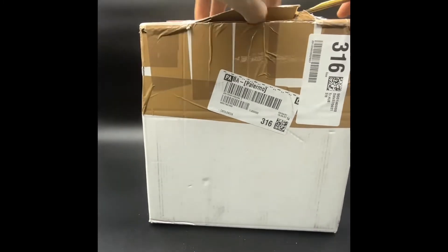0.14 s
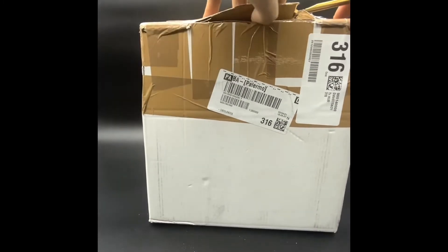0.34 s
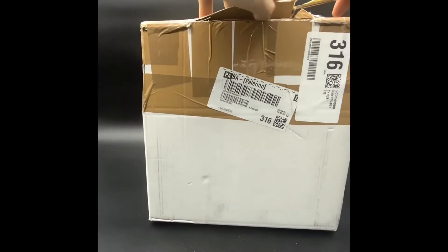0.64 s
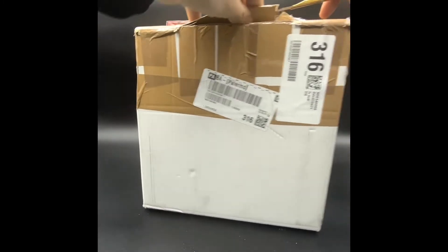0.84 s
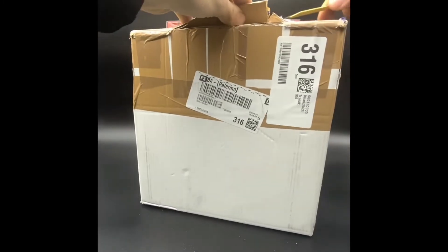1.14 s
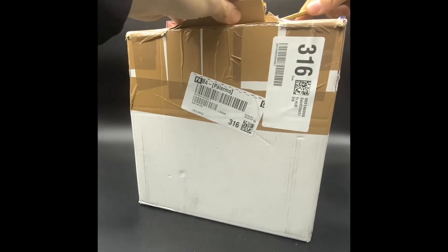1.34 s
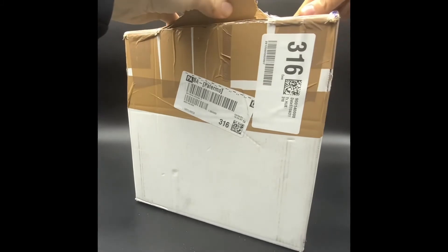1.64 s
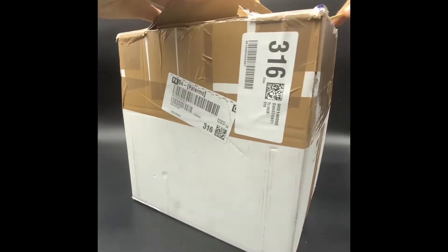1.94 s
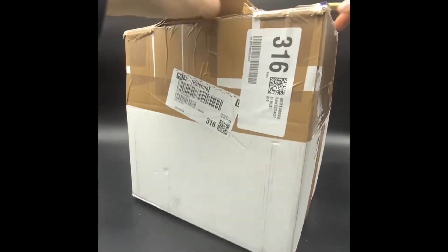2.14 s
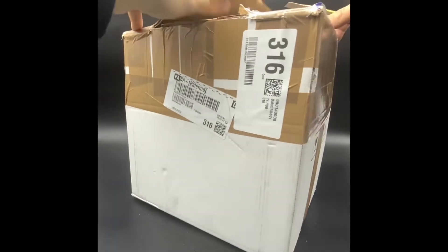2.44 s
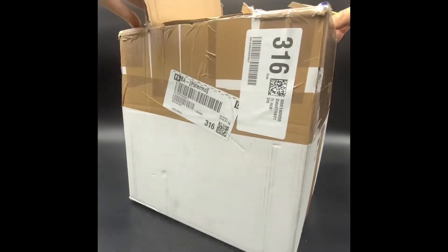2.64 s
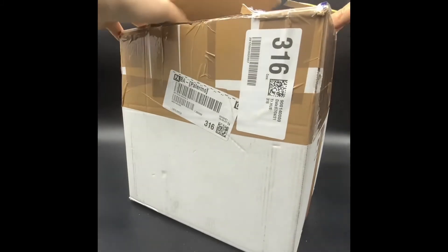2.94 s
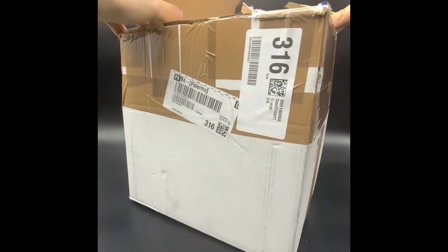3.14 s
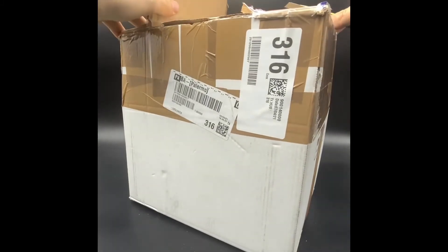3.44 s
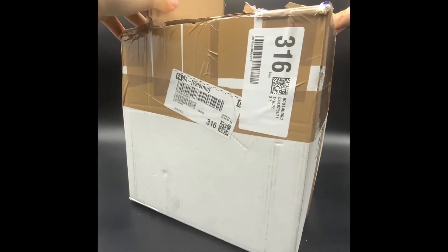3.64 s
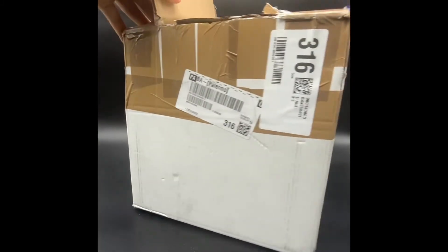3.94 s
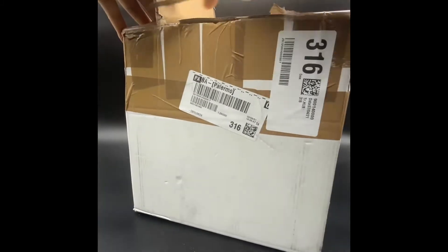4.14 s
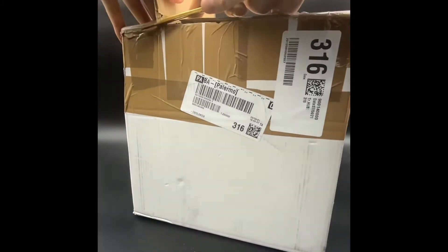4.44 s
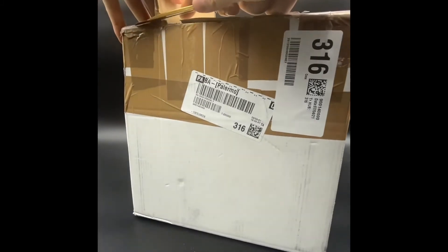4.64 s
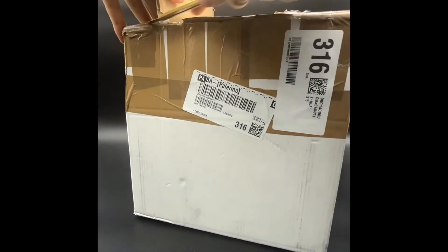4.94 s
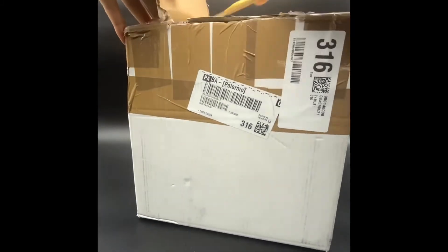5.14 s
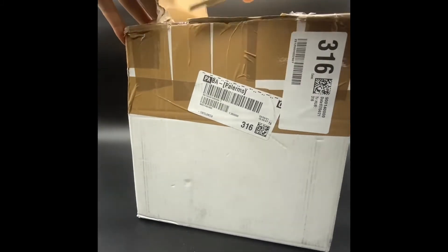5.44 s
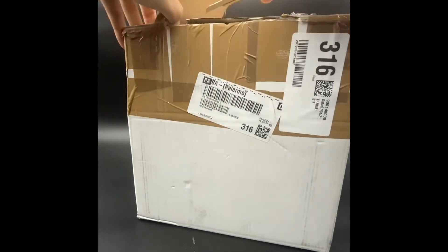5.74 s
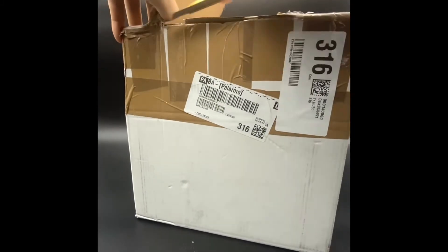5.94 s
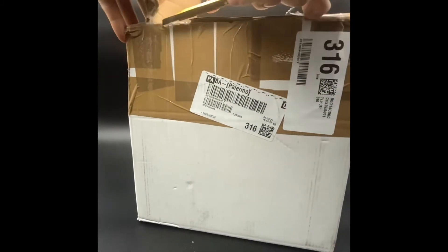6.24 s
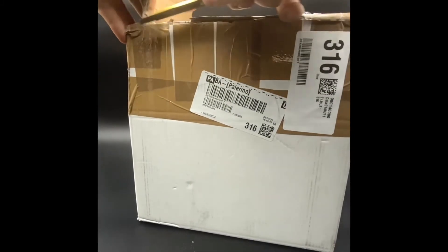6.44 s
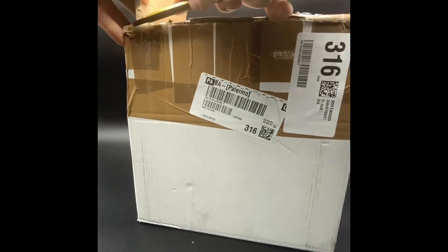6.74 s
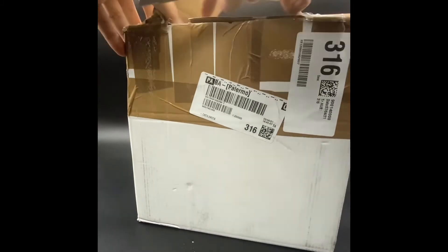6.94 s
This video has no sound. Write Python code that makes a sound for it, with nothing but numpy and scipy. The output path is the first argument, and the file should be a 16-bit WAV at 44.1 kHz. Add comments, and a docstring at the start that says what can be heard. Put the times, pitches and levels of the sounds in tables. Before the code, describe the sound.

A taped cardboard box is opened by hand, very close to the microphone, in a small quiet room with a faint low hum. Soft rubbing and scraping lead into two loud, short rips with hollow thumps from the box. Lighter crackles and rustles follow, then a quick zip of tape, another tear and a sharp crack. The flaps keep rasping to the end.

```python
"""A card flap scrapes softly over a low hum: hands are opening a taped box close to the microphone.
The room is small and quiet. The hollow box rumbles in the grip, and its flaps tear, rub and rasp
in dense tiny slips. Tape and fibres give way in sharp snaps, each sending a bending wave through the
panels, treble first and thump last. Shoved walls ring, and later a strip of tape zips loose.
Two close microphone ports pick up the box directly, off its flaps and through the room."""
import sys
import numpy as np
from scipy import signal
from scipy.fft import rfft, irfft, next_fast_len
from scipy.io import wavfile
from scipy.ndimage import uniform_filter1d

SR = 44100
rng = np.random.default_rng(int(sys.argv[2]) if len(sys.argv) > 2 else 0)


def wrap_up_sound(samples):
    """Save the sound to the file named by the first command line argument, as 16-bit audio."""
    columns = np.atleast_2d(samples).T
    # keep every value between -1 and 1, then stretch to whole-number steps
    tamed = np.clip(columns, -1, 1)
    steps = np.round(tamed * 32767).astype(np.int16)
    wavfile.write(sys.argv[1], SR, steps)


N = 312669
SIZE = next_fast_len(N + SR, True)
HZ = np.maximum(np.arange(SIZE // 2 + 1) * SR / SIZE, 1)
TIME = np.arange(N) / SR


def from_db(db):
    return 10 ** (np.asarray(db) / 20)


def unit_rms(x):
    return x / np.sqrt(np.mean(x ** 2) + 1e-20)


def at_hz(points, hz):
    """Join (frequency_hz, value) points on a log-frequency axis."""
    point_hz, value = np.transpose(points)
    return np.interp(np.log(hz), np.log(point_hz), value)


def bell(hz, centre_hz, width_hz):
    """Shape of one resonance, 1 on top."""
    return 1 / (1 + (2 * (hz - centre_hz) / width_hz) ** 2)


def modes_db(modes):
    """Gain curve of a set of resonances and gaps."""
    return sum(db * bell(HZ, hz, width) for hz, width, db in modes)


def causal(db):
    """Minimum-phase response for a gain curve: nothing sounds before its cause."""
    cepstrum = irfft(db * np.log(10) / 20)
    half = len(cepstrum) // 2
    cepstrum[1:half] *= 2
    cepstrum[half + 1:] = 0
    return np.exp(rfft(cepstrum))


def filtered(x, response):
    return irfft(rfft(x, SIZE) * response, SIZE)[..., :N]


def drift(per_s):
    """A random wander with a spread of about 1."""
    return np.interp(TIME * per_s, np.arange(4096), rng.standard_normal(4096))


# The quiet room's air at the microphone: frequency_hz, gain_db
AIR_SPECTRUM = [(20, -60), (80, -62.5), (200, -57), (400, -68.5), (1000, -78), (3000, -97.5), (6000, -81.5),
                (11000, -101), (16000, -112)]
# Low drone behind the box, swelling early, then slowly fading: time_s, level_db
DRONE_LEVELS = [(0, -56), (1.7, -49), (3.0, -55), (4.7, -58), (7.09, -63)]
# The rumble within that drone: frequency_hz, gain_db
DRONE_SPECTRUM = [(20, -34.5), (45, -22), (66, -3), (81, 7.5), (92, -6.5), (110, -15), (160, -30),
                  (400, -58)]
# How wide the room's air and reflections sound at the microphone: frequency_hz, side_db
ROOM_WIDTH = [(80, -30), (200, -13.5), (400, -6), (700, 8.5), (1300, 3.5), (2500, -2), (6500, -1),
              (9000, -14.5), (14000, -8)]
def room_tone(air_db, hum_hz, hum_db, hum_waver):
    """A low drone with a wavering hum in it and a thin hiss, as mid and side."""
    air = filtered(rng.standard_normal((2, N)), from_db(at_hz(AIR_SPECTRUM, HZ)))
    rumble = filtered(rng.standard_normal((2, N)), from_db(at_hz(DRONE_SPECTRUM, HZ)))
    hum = np.sin(2 * np.pi * np.cumsum(hum_hz * (1 + hum_waver * drift(6))) / SR)
    drone = unit_rms(unit_rms(rumble) + from_db(hum_db) * unit_rms(hum))
    drone_gain = from_db(np.interp(TIME, *np.transpose(DRONE_LEVELS)))
    mid, side = from_db(air_db) * unit_rms(air) + drone_gain * drone
    return np.array([mid, filtered(side, from_db(at_hz(ROOM_WIDTH, HZ)))])


def slips(per_s, spread_db, smooth_db, judder_db):
    """Friction force: tiny slips of uneven size over a smooth rub, clumped by judder."""
    sizes = from_db(spread_db * np.minimum(rng.exponential(1, N), 4)) * rng.choice([-1, 1], N)
    clicks = unit_rms(sizes * (rng.random(N) < per_s / SR))
    rub = from_db(smooth_db) * rng.standard_normal(N)
    return unit_rms((clicks + rub) * from_db(judder_db * drift(160)))


# Hands on the box, close up, tightening for a pull and easing between: time_s, rumble_db, skin_db
GRIP = [(0, -58, -56.5), (.45, -62, -55), (.71, -53, -54), (1.029, -55.5, -53.5), (1.22, -45.5, -49),
        (1.7, -53.5, -58.5), (2.07, -51, -53.5), (2.47, -47.5, -39.5), (2.74, -56, -60), (3.2, -56, -71),
        (3.47, -55, -50.5), (3.879, -52.5, -52.5), (4.01, -54, -57.5), (4.44, -59, -64), (4.52, -57, -56),
        (4.619, -60, -66), (4.72, -58, -54.5), (4.95, -51, -47), (5.35, -61, -62), (5.45, -60, -51),
        (5.58, -53, -62), (5.75, -57, -52), (6.32, -53, -51), (6.62, -76, -60), (7.09, -36, -33)]
# The hollow box as it is pushed: frequency_hz, gain_db
RUMBLE_SPECTRUM = [(30, -25), (70, -23.5), (110, 1), (200, 8), (300, -4), (500, -22), (1200, -56.5)]
# Skin rubbing on card: frequency_hz, gain_db
SKIN_SPECTRUM = [(120, -44), (330, 1.5), (700, -0.5), (1600, -1.5), (2700, -8.5), (6000, -10.5),
                 (9500, -12), (12000, -16), (16000, -25)]
def handling(rumble_trim_db, skin_trim_db):
    """The held box rumbles and skin creeps over the card."""
    time_s, rumble_db, skin_db = np.transpose(GRIP)
    push = slips(per_s=390, spread_db=1.5, smooth_db=-5, judder_db=0)
    creep = slips(per_s=1200, spread_db=2, smooth_db=-0.5, judder_db=1.5)
    rumble = unit_rms(filtered(push, causal(at_hz(RUMBLE_SPECTRUM, HZ))))
    skin = unit_rms(filtered(creep, causal(at_hz(SKIN_SPECTRUM, HZ))))
    rumble *= from_db(np.interp(TIME, time_s, rumble_db) + rumble_trim_db)
    skin *= from_db(np.interp(TIME, time_s, skin_db) + skin_trim_db)
    return rumble + skin


# Five registers of the card's sound, from thump to top treble: centre_hz
REGISTER_HZ = [160, 450, 1450, 4500, 11000]
def card_colour_db(hz, balance_db, level_db, weight_db, bright_db):
    """Weight lifts the lows as the wall is shoved; brightness lifts the highs as tape takes the strain."""
    lows_db = weight_db * np.array([1, 0.38, 0, 0, 0])
    highs_db = bright_db * np.array([0, 0, 0, 0.66, 1])
    power_db = level_db + np.array(balance_db) + lows_db + highs_db
    density_db = power_db - 10 * np.log10(np.array(REGISTER_HZ) / (SR / 2))
    return at_hz(np.column_stack([REGISTER_HZ, density_db]), hz)


def travelling_tear(force, shift_db, shifts_per_s):
    """As the tear travels, each band of the card answers now more, now less."""
    centres_hz = np.geomspace(600, 14000, 16)
    band_index = np.interp(np.log(HZ), np.log(centres_hz), np.arange(len(centres_hz)))
    out = np.zeros(N)
    for k in range(len(centres_hz)):
        band = filtered(force, np.maximum(1 - np.abs(band_index - k), 0))
        out += band * from_db(shift_db * drift(shifts_per_s))
    return unit_rms(out)


def slide_speed(span, *times_s):
    """Speed rises from 0 at the earliest of three times to 1 at the middle one, then falls to 0."""
    return np.interp(TIME[span], np.sort(times_s), [0, 1, 0])


# Flaps tearing and sliding close to the microphone. Of a pull's three times, it starts at the
# earliest, is fastest at the middle one and ends at the latest:
# time_a_s, time_b_s, time_c_s, level_db, weight_db, bright_db, flap_hz
PULLS = [(0, 0.04, 0.086, -50.5, 2.5, -10, 1550), (0.103, 0.17, 0.24, -50, 0.5, -48, 460),
         (0.308, 0.322, 0.36, -53.5, 3, -1.5, 3240), (0.505, 0.527, 0.69, -48.5, 0.5, -6.5, 424),
         (0.62, 0.786, .88, -38, -12.5, -7, 1000), (1.11, 1.143, 1.17, -48, -5.5, 6, 3050),
         (1.178, 1.247, 1.37, -40.5, -15.5, -5.5, 1680), (1.303, 1.457, 1.6, -46.5, -11.5, -3.5, 2010),
         (1.641, 1.692, 1.73, -40.5, 7, 1.5, 1570), (1.696, 1.769, 1.775, -35, -1.5, 4.5, 1230),
         (1.746, 1.808, 1.896, -36, -7.5, -5, 2000), (1.972, 2.103, 2.125, -49, 4.5, -1.5, 1830),
         (2.14, 2.187, 2.27, -44, 3, -9.5, 1540), (2.15, 2.27, 2.295, -58, -5, 12.5, 1500),
         (2.436, 2.505, 2.497, -35.5, 2, 4.5, 1370), (2.47, 2.523, 2.64, -63, 16, 3.5, 200),
         (2.687, 2.707, 2.86, -48.5, -9, 0.5, 1860), (2.825, 2.871, 2.98, -53, 0, 7, 1870),
         (2.953, 3.019, 3.06, -59.5, 4.5, 8.5, 1405), (3.251, 3.259, 3.33, -54, -2, 6.5, 1800),
         (3.364, 3.37, 3.56, -46.5, -9.5, -4, 1130), (3.516, 3.574, 3.62, -57, -6.5, 12, 1637),
         (3.611, 3.704, 3.82, -49, 1.5, -5, 1580), (3.72, 3.84, 3.935, -42, -9, -11.5, 1740),
         (3.88, 4.113, 4.12, -62, 1, -13, 1390), (4.17, 4.245, 4.41, -62.5, 1, 8.5, 1380),
         (4.913, 4.986, 5.16, -38, -11.5, 4, 1290), (4.957, 5.007, 5.065, -35.5, 0.5, 6, 1330),
         (5.115, 5.106, 5.16, -41, -3.5, 8, 1340), (5.154, 5.265, 5.35, -51, -14, 7.5, 1330),
         (5.382, 5.408, 5.45, -50, 1, -1.5, 1270), (5.47, 5.539, 5.6, -44.5, 4, 5.5, 1520),
         (5.595, 5.605, 5.75, -55.5, 13.5, 0, 1150), (5.683, 5.72, 6.04, -53.5, -4, 5.5, 1650),
         (5.884, 5.976, 6.03, -51.5, -22, 7.5, 1349), (6.04, 6.069, 6.135, -36, -3.5, 2.5, 1470),
         (6.14, 6.225, 6.2, -42.5, 0, 5, 1360), (6.286, 6.34, 6.43, -44, -9, 4.5, 1360),
         (6.332, 6.447, 6.62, -41, -5.5, 8, 1345), (6.732, 6.832, 6.92, -43.5, 8.5, 3, 1730),
         (6.898, 6.959, 7, -42.5, -8.5, 3, 1360)]
# A pull's usual balance, one value a register: gain_db
PULL_BALANCE_DB = [-0.55, 0.041, 0.55, -1.9, 0.92]
# The bottom and top of a pull's spectrum: frequency_hz, gain_db
PULL_EDGES = [(30, -22.5), (80, 5.5), (150, 0), (12000, 0), (16000, -8)]
def flap_pulls(flap_db, flap_width_hz):
    """Each pull speeds up and slows; fine slips set the flap rasping and coarser catches make it creak."""
    fine_slips = slips(per_s=1200, spread_db=3, smooth_db=-2.5, judder_db=2.2)
    grit = from_db(-5.5) * travelling_tear(fine_slips, shift_db=3, shifts_per_s=45)
    catches = from_db(-10.5) * slips(per_s=120, spread_db=3.5, smooth_db=-32, judder_db=3)
    size = 32768
    hz = np.maximum(np.arange(size // 2 + 1) * SR / size, 1)
    out = np.zeros(SIZE)
    for *times_s, level_db, weight_db, bright_db, flap_hz in PULLS:
        first = max(round(times_s[0] * SR), 0)
        span = slice(first, first + size)
        speed = slide_speed(span, *times_s)
        colour_db = card_colour_db(hz, PULL_BALANCE_DB, level_db, weight_db, bright_db)
        colour_db += at_hz(PULL_EDGES, hz) + flap_db * bell(hz, flap_hz, flap_width_hz)
        scrape = rfft(grit[span] * speed, size)
        creak = rfft(catches[span] * speed, size) / (1 + 2j * (hz - flap_hz) / flap_width_hz)
        out[span] += irfft((scrape + creak) * causal(colour_db))
    return out[:N]


# Rubbed card edges rasping and tape whistling, on the box close by:
# start_s, fastest_s, end_s, level_db, pitch_hz, width_hz
RASPS = [(0.04, .37, 0.63, -66.5, 5170, 110), (0.027, 0.41, 0.56, -68, 6650, 300),
         (0.5, .53, .66, -53, 1300, 400), (1.745, 1.772, 1.815, -41, 1260, 200),
         (1.72, 1.81, 1.86, -38.5, 1660, 220), (1.79, 1.83, 1.86, -39, 2080, 200),
         (3.74, 3.87, 3.96, -48.5, 1750, 380), (3.96, 4.13, 4.4, -68, 6100, 450),
         (4.93, 4.99, 5.1, -42, 1310, 190), (4.9, 4.97, 5.05, -44, 3300, 350),
         (6.18, 6.222, 6.25, -46, 1500, 200), (6.28, 6.43, 6.6, -43, 1330, 160)]
def edge_rasps(wander, wander_per_s):
    """Slips keep a sliding edge ringing; its pitch wanders within its width as the contact moves."""
    force = slips(per_s=410, spread_db=1.5, smooth_db=-4.5, judder_db=3)
    bend = wander * drift(wander_per_s)
    out = np.zeros(N)
    for start_s, fastest_s, end_s, level_db, pitch_hz, width_hz in RASPS:
        span = slice(max(round(start_s * SR), 0), round(end_s * SR))
        speed = slide_speed(span, start_s, fastest_s, end_s)
        # a one-pole resonator that follows the moving pitch
        carrier = np.exp(2j * np.pi * np.cumsum(pitch_hz + width_hz * bend[span]) / SR)
        pole = np.exp(-np.pi * width_hz / SR)
        ring = carrier * signal.lfilter([1], [1, -pole], force[span] / carrier)
        out[span] += from_db(level_db) * speed * unit_rms(ring.real)
    return out


def stray_fibres(per_pull, offset_db, spread_db, opening_s, run_out_s, low_hz, high_hz, ring_db):
    """Stray fibres crackle during each pull; gives rows for snaps()."""
    rows = []
    for time_a_s, time_b_s, time_c_s, level_db, weight_db, bright_db, _ in PULLS:
        window_s = [(time_a_s + time_b_s) / 2, time_b_s, (time_b_s + time_c_s) / 2]
        for when, size, place in rng.random((per_pull, 3)):
            break_s = max(np.interp(when, [0, .5, 1], window_s), 0)
            break_db = level_db + offset_db + spread_db * (2 * size - 1)
            ring_hz = low_hz * (high_hz / low_hz) ** place
            rows.append((break_s, break_db, weight_db, bright_db, opening_s, run_out_s, ring_hz, ring_db))
    return rows


def first_fibres(lead_s, tick_db, follows_level):
    """A few fibres part with a faint tick just ahead of each break; gives rows for snaps()."""
    middling_db = np.median([row[1] for row in SNAPS])
    leads_s = lead_s * rng.uniform(0.54, 1.5, len(SNAPS))
    return [(start_s - ahead_s, tick_db + follows_level * (level_db - middling_db), *rest)
            for (start_s, level_db, *rest), ahead_s in zip(SNAPS, leads_s)]


# Tape and card giving way close to the microphone; where it breaks picks which part rings:
# start_s, level_db, weight_db, bright_db, opening_s, run_out_s, ring_hz, ring_db
SNAPS = [(0.1918, -58.5, -4, 16.5, 0.0023, .0075, 8100, 4.5), (0.272, -72, -10, 12, .0003, .0012, 12000, 6),
         (0.553, -56, 4, -2, .0006, .002, 1250, 7), (0.9681, -52, -8, 19.5, 0.0012, .0032, 7700, 10.5),
         (1.0534, -51, -12, 1, 0.00088, .004, 6170, 1), (1.0857, -38, -15, 4, 0.0013, .0065, 6460, 5.5),
         (1.098, -34, 0.5, 5.5, .003, .0059, 279, 6), (1.1493, -35, 6, -2, 0.0013, .003, 3620, 6),
         (1.204, -47, 1, -6.5, .001, .003, 1470, 10.5), (1.3395, -38.5, 2.5, -1.5, 0.0055, .005, 2890, 12),
         (1.366, -44, 2, -7.5, 0.0031, .0036, 287, 11), (1.44, -54.5, 3.5, -1, 0.0011, .003, 2870, 13),
         (1.476, -53.5, -5.5, -3, 0.00061, .002, 2970, 10), (1.574, -55, -12, -2.5, 0.00057, .002, 2300, 7),
         (1.634, -51, -8, 12, 0.00028, .0036, 6080, 12), (1.7092, -21.5, 7.5, -10.5, 0.0031, .0054, 511, 9),
         (1.7115, -32.5, -4.5, -6, 0.0015, .004, 3250, 12), (1.739, -37, -3, 0.5, .003, .0033, 3620, 13.5),
         (2.174, -52.5, 3, 0, 0.0012, .003, 1495, 8), (2.324, -37.5, 3, -26.5, .0008, .0014, 1080, 9),
         (2.345, -39, 10.5, -16, 0.0018, .0017, 92, 8.5), (2.383, -59, -10, 10, .0005, .002, 5600, 6),
         (2.402, -21.5, -8, -4.5, 0.0025, .0065, 6220, 8.5),
         (2.407, -26, -5, -15, 0.0024, .002, 1360, 10.5), (2.4292, -28, 3, -2, 0.0036, .003, 3480, 9),
         (2.501, -40, -8.5, 1.5, 0.00049, .002, 3790, 5.5), (2.706, -55.5, 8, -3, .001, .0033, 1190, 14),
         (2.756, -54, 14, 12.5, .003, .0091, 166, 10), (2.809, -39.5, 9.5, -3.5, .003, .003, 126.4, 7),
         (3.294, -45.5, -21, 0.5, .0003, .0012, 9200, 7), (3.3533, -43, -7, 7, 0.00084, .0022, 8140, 9.5),
         (3.385, -56, -12, 6, .001, .002, 9500, 5), (3.4128, -55, -6, 3, .0004, .002, 9466, 8.5),
         (3.427, -47, 0, 4.5, .0002, .0012, 11200, 10), (3.452, -41.5, -5, 1, .0004, .005, 12000, 8),
         (3.4608, -33, -9, 7.5, 0.00014, .0016, 9100, 5), (3.735, -53, 9.5, -4, .001, .0022, 162, 8),
         (3.754, -52, 8, -12, .001, .002, 420, 7), (4.266, -51.5, 18, -22, 0.0027, .0099, 760, 8),
         (4.3682, -65.5, 4.5, 10, 0.00019, .0015, 11200, 9), (4.4658, -68, 0, 9, 0.00026, .0015, 12000, 13),
         (4.4805, -54.5, 7, 3.5, .001, .004, 1390, 8), (4.688, -56, -15, 9, .0003, .0015, 10700, 7),
         (4.7037, -30.5, -20, 9, 0.00024, .003, 10700, 7), (4.8177, -50, -23, 5, 0.0008, .0028, 2920, 6.5),
         (4.867, -53, -10, 4.5, 0.00057, .003, 7300, 9), (4.946, -47.5, -5, 3, 0.00068, .003, 1289, 1),
         (4.987, -29, -11, 3, 0.0036, .003, 3100, 5), (4.9919, -24.5, -1.5, -16, .002, 0.0017, 870, 9),
         (5.105, -33.5, -13, -5.5, .0006, 0.0014, 3070, 8), (5.232, -49.5, -12, 0, .0005, .002, 1330, 9),
         (5.51, -61.5, 8, 15, .002, .005, 10300, 10.5), (5.587, -39, -20, -9, 0.00015, .0007, 2055, 9.5),
         (5.61, -47.5, 12.5, -27, .001, .0024, 850, 10), (5.688, -41, -1.5, -12, 0.00069, .0015, 841, 10.5),
         (5.754, -44, -30.5, -12, 0.0002, .0008, 1850, 8),
         (5.875, -55.5, -2.5, 9, 0.00078, .0027, 1650, 12.5),
         (5.92, -34.5, -4, -1, 0.00097, .0044, 1370, 11.5),
         (6.028, -17.5, -4, -5.5, .0004, 0.0026, 1300, 10),
         (6.03, -24, -3, -21.5, 0.00033, .003, 866, 14.5), (6.69, -62, -2, 4, 0.00072, .002, 6160, 6),
         (6.696, -50.5, -4, 4.5, 0.00045, .002, 6101, 9.5), (6.765, -52, -8, -8, .0005, .001, 3300, 6),
         (6.8505, -38, -4, -11, .0004, .001, 2020, 8), (6.945, -45.5, -31.5, 0, .001, .0025, 5900, 11.5),
         (6.98, -50, -38, 11, 0.00073, .0024, 1400, 12), (6.998, -36, -39, -5.5, 0.0012, .003, 1370, 10),
         (7.026, -44, -25, -10, .0006, .0015, 1450, 8), (7.037, -44, -25, -10, .0006, .0015, 1300, 8),
         (7.077, -28, -19, 1, 0.00081, .002, 5300, 12)]
# A snap's usual balance, one value a register: gain_db
SNAP_BALANCE_DB = [2.3, 0.4, 1.3, 0.27, 0.99]
# The bottom and top of a snap's spectrum: frequency_hz, gain_db
SNAP_EDGES = [(25, -44), (60, -8), (120, -3.5), (11000, 2.5), (16000, -5.5)]
def snaps(rows, crack_s=0.00029, grain_db=3.5, lag_at_1khz_s=0.003006, wave_below_hz=770, ring_q=4):
    """Each break is a run of parting fibres and a bending wave whose lows arrive late."""
    size = 8192
    t = np.arange(size) / SR
    hz = np.maximum(np.arange(size // 2 + 1) * SR / size, 1)
    # bending waves travel at a speed that grows with the root of frequency
    bending_wave = np.exp(-4j * np.pi * lag_at_1khz_s * np.sqrt(1e3 * hz))
    wave_share = 1 / (1 + (hz / wave_below_hz) ** 4)
    crack = from_db(6.5) * np.exp(-t / crack_s)
    out = np.zeros(SIZE)
    for start_s, level_db, weight_db, bright_db, opening_s, run_out_s, ring_hz, ring_db in rows:
        rise = 1 - np.exp(-(t / opening_s) ** 2)
        trail = from_db(-4) * np.exp(-t / (0.0055 + 1.1 * run_out_s))
        fade = crack + np.exp(-t / run_out_s) + trail
        grains = np.repeat(from_db(grain_db * rng.standard_normal(size // 16)), 16)
        fibres = rfft(rng.standard_normal(size) * grains * fade * rise)
        # the fibres release the same energy however they happen to part
        fibres *= causal(-10 * np.log10(uniform_filter1d(np.abs(fibres) ** 2, size=161)))
        release = np.sqrt(wave_share) * bending_wave + np.sqrt(1 - wave_share) * fibres
        colour_db = card_colour_db(hz, SNAP_BALANCE_DB, level_db, weight_db, bright_db)
        colour_db += at_hz(SNAP_EDGES, hz) + ring_db * bell(hz, ring_hz, ring_hz / ring_q)
        first = round(start_s * SR)
        out[first:first + size] += irfft(causal(colour_db) * release)
    return from_db(25) * out[:N]


# Shoved walls, flaps and stiff edges springing back close by, pitched by their size and the grip:
# start_s, level_db, pitch_hz, t60_s
WALL_FLEXES = [(1.101, -29.5, 278, 0.08), (1.153, -31, 250, .08), (1.712, -23, 625, .035),
               (1.713, -23, 1560, .04), (1.715, -12.5, 163, .1), (1.717, -19.5, 262, 0.05),
               (1.735, -32, 151, 0.57), (2.35, -24, 83, 0.14), (2.405, -23, 1430, .03),
               (2.411, -17.5, 165, 0.15), (2.413, -23, 205, .12), (2.43, -17, 77.6, 0.11),
               (2.435, -32.5, 204, 0.4), (2.436, -20.5, 498, 0.07), (2.816, -24.5, 116, .09),
               (2.818, -37, 205, .14), (3.2942, -32, 1820, .015), (3.2944, -39, 4400, .025),
               (4.269, -32.5, 257.3, 0.044), (4.994, -22.5, 271, .11), (4.9938, -20, 418, .07),
               (4.992, -24, 1300, .04), (4.9925, -21, 1800, .03), (4.993, -23, 872, .05),
               (5.557, -31, 112, .06), (5.61, -40, 440, .09), (5.611, -40, 640, .07),
               (5.612, -35.5, 266, 0.065), (6.0285, -14, 1330, .028), (6.0295, -16, 875, .055),
               (6.03, -18, 590, .03), (6.031, -19, 259, .06), (6.032, -12, 106.3, .08),
               (6.059, -40, 124.4, 0.29)]
def wall_flexes(swell_cycles, waver, waver_per_s):
    """Each part swings out within a cycle and rings down, its pitch wavering as the strain shifts."""
    bend = 1 + waver * drift(waver_per_s)
    out = np.zeros(N)
    for start_s, level_db, pitch_hz, t60_s in WALL_FLEXES:
        first = round(start_s * SR)
        t = TIME[:min(SR // 2, N - first)]
        span = slice(first, first + len(t))
        swell = 1 - np.exp(-(t * pitch_hz / swell_cycles) ** 2)
        ring = np.sin(2 * np.pi * pitch_hz * np.cumsum(bend[span]) / SR)
        out[span] += from_db(level_db - 60 * t / t60_s) * swell * ring
    return out


# One strip of tape zipping off the card, close up: start_s, length_s, level_db, slip_hz
ZIP = (4.7037, .066, -25, 490)
# Ring of the taut strip: centre_hz, width_hz, gain_db
ZIP_MODES = [(2250, 500, 8), (6720, 600, 12), (10800, 1700, 9)]
# The strip's broad spectrum under that ring: frequency_hz, gain_db
ZIP_SPECTRUM = [(100, -25), (700, -9), (1200, 0), (11500, -1), (14000, -6), (16000, -9)]
def tape_zip(fade_db_per_s, slip_decay_s, jitter):
    """Taut tape lets go in a dying run of nearly regular slips; each tiny burst sets the strip ringing."""
    start_s, length_s, level_db, slip_hz = ZIP
    t = TIME[:round(length_s * SR)]
    slip_count = np.cumsum(slip_hz * (1 + jitter * drift(300)[:len(t)])) / SR
    since_slip_s = (slip_count % 1) / slip_hz
    force = unit_rms(rng.standard_normal(len(t)) * np.exp(-since_slip_s / slip_decay_s))
    fade = from_db(level_db - fade_db_per_s * t) * np.sqrt(1 - (t / length_s) ** 2)
    out = np.zeros(N)
    first = round(start_s * SR)
    out[first:first + len(t)] = force * fade
    return filtered(out, causal(at_hz(ZIP_SPECTRUM, HZ) + modes_db(ZIP_MODES)))


def flap_echoes(level_db, decay_s, above_hz):
    """Treble glances off the nearby flaps and reaches each port by other paths."""
    t = TIME[:SR // 20]
    echoes = rng.standard_normal(len(t)) * np.exp(-t / decay_s)
    return from_db(level_db) * rfft(echoes / np.linalg.norm(echoes), SIZE) * HZ / (HZ + above_hz)


# Decay of the small room, short except in the bass: frequency_hz, t60_s
ROOM_T60 = [(80, 0.85), (200, 0.17), (500, 0.15), (2000, 0.11), (7000, 0.12), (16000, 0.14)]
# Strength of its reflections with the microphone close to the box: frequency_hz, gain_db
ROOM_SEND = [(80, -10), (200, -12), (600, -10), (2000, -12), (7000, -11.5), (16000, -15)]
def room_response(first_echo_s):
    """Dense reflections, dying at a rate of their own in each octave."""
    t = TIME[:SR * 3 // 4]
    out = np.zeros(len(t))
    for low_hz in 45 * 2. ** np.arange(9):
        high_hz = min(2 * low_hz, .45 * SR)
        t60_s = at_hz(ROOM_T60, np.sqrt(low_hz * high_hz))
        tail = rng.standard_normal(len(t)) * from_db(-60 * t / t60_s) * (t > first_echo_s)
        band = signal.sosfilt(signal.butter(2, [low_hz, high_hz], "band", fs=SR, output="sos"), tail)
        out += band * np.sqrt((high_hz - low_hz) / (SR / 2) / np.sum(band ** 2))
    return rfft(out, SIZE) * from_db(at_hz(ROOM_SEND, HZ))


# Resonances and gaps of the panels, the air inside and the tape: centre_hz, width_hz, gain_db
BOX_MODES = [(161, 81, 2), (202.5, 6.4, 6.5), (263.7, 36, 7), (359, 98, 6), (528, 42, 4.5), (700, 30, -6.5),
             (852, 26, 3), (1030, 650, -6), (1318, 300, 4.5), (1790, 180, 2), (2370, 2500, -3.5),
             (3370, 540, 2), (6140, 1030, 5), (7200, 640, -3.5), (10040, 1400, 1.5)]
# The box at the two microphone ports, side relative to mid: frequency_hz, side_db
PORT_SIDE = [(60, -23.5), (220, -20), (350, -11), (520, -3), (720, 5), (900, -1.5), (1350, -9), (1600, -9),
             (2300, 1), (3400, -5.5), (4700, -6), (6200, -4), (8200, -6), (12000, -16)]
# Phase of that side signal: frequency_hz, phase_rad
PORT_PHASE = [(100, 1.7), (220, 1.9), (350, 1.2), (700, .75), (1100, 1.5), (1350, 1.1), (1900, 1.7),
              (2500, .9), (3400, 1.2), (4700, -2.4), (6200, -2.5), (8200, -1.4), (12000, -1.75)]
def scene():
    """Each part of the box sounds directly, off the flaps and through the room into two close ports."""
    # three sets of snaps, so that each glances off the flaps in its own way
    parts = [snaps(SNAPS[k::3]) for k in range(3)]
    parts.append(flap_pulls(flap_db=4.5, flap_width_hz=270))
    parts.append(handling(rumble_trim_db=-8, skin_trim_db=-7))
    crackles = stray_fibres(per_pull=3, offset_db=-17, spread_db=2.5, opening_s=.0002, run_out_s=.001,
                            low_hz=1100, high_hz=6500, ring_db=9)
    ticks = first_fibres(lead_s=0.0074, tick_db=-67.5, follows_level=.6)
    parts.append(snaps(crackles + ticks))
    walls = wall_flexes(swell_cycles=0.37, waver=.015, waver_per_s=60)
    parts.append(walls + edge_rasps(wander=0.16, wander_per_s=25))
    parts.append(tape_zip(fade_db_per_s=330, slip_decay_s=.0009, jitter=.05))

    box_response = causal(modes_db(BOX_MODES))
    spectra = [rfft(part, SIZE) * box_response for part in parts]
    direct = sum(spectra)
    glances = sum(part * flap_echoes(level_db=2.5, decay_s=.005, above_hz=910) for part in spectra)
    ports = from_db(at_hz(PORT_SIDE, HZ)) * np.exp(1j * at_hz(PORT_PHASE, HZ))
    mid = direct * (1 + room_response(first_echo_s=0.0038))
    room_side = direct * room_response(first_echo_s=0.0018) * from_db(at_hz(ROOM_WIDTH, HZ))
    side = ports * (direct + glances) + room_side
    background = room_tone(air_db=-63, hum_hz=81, hum_db=-3, hum_waver=.025)
    mid, side = irfft(np.array([mid, side]), SIZE)[:, :N] + background
    return np.array([mid + side, mid - side])


def record(dry):
    """The highest peaks are rounded and the top treble is cut."""
    ceiling, cutoff_hz = .92, 16200
    rounded = ceiling * np.tanh(dry / ceiling)
    return signal.sosfilt(signal.ellip(10, .2, 80, cutoff_hz, fs=SR, output="sos"), rounded)


dry = scene()
out = record(dry)
wrap_up_sound(out)
```